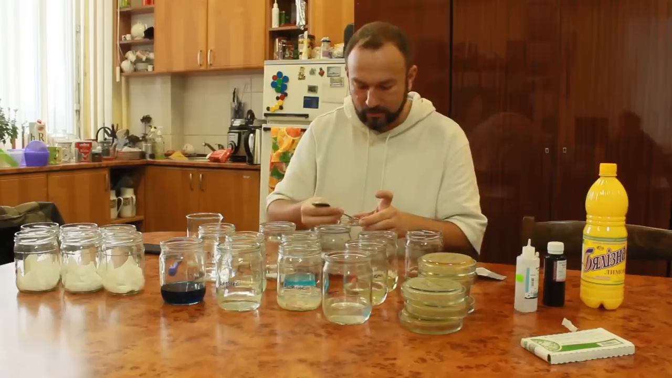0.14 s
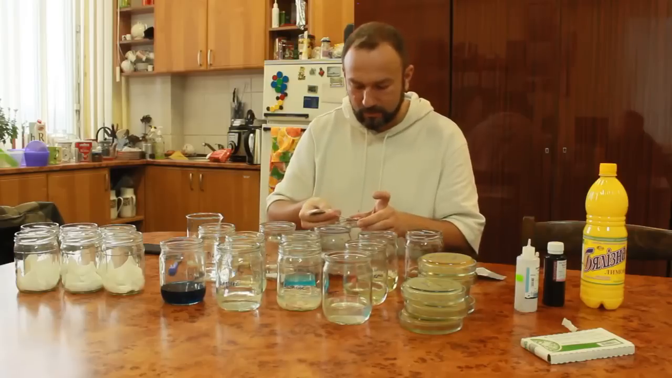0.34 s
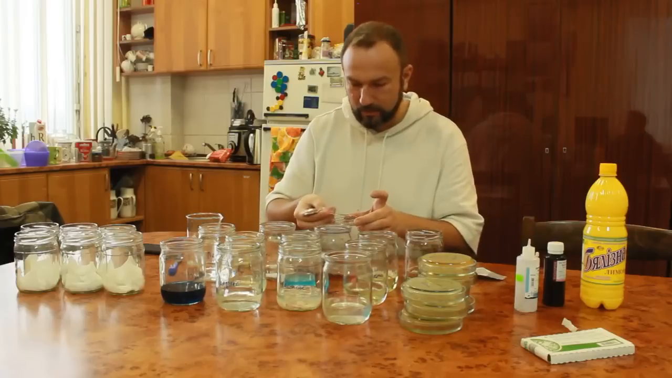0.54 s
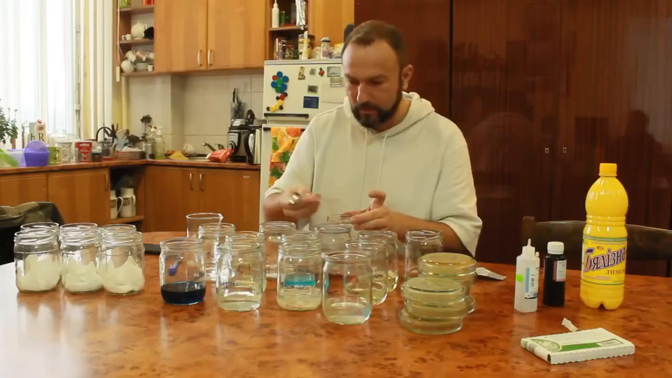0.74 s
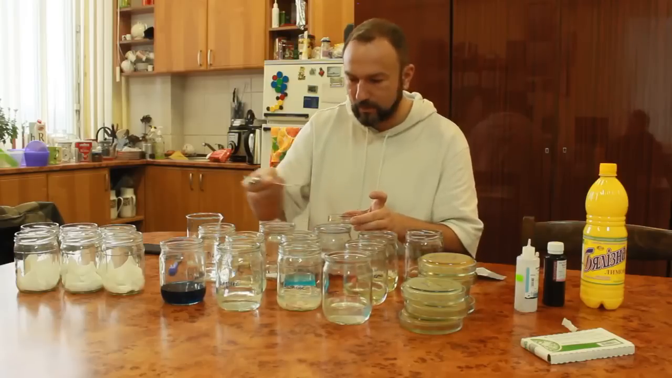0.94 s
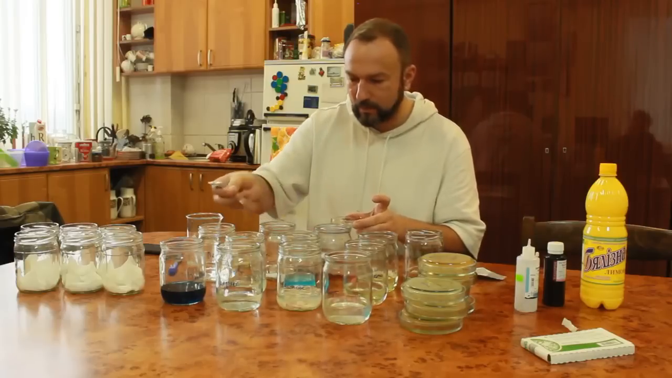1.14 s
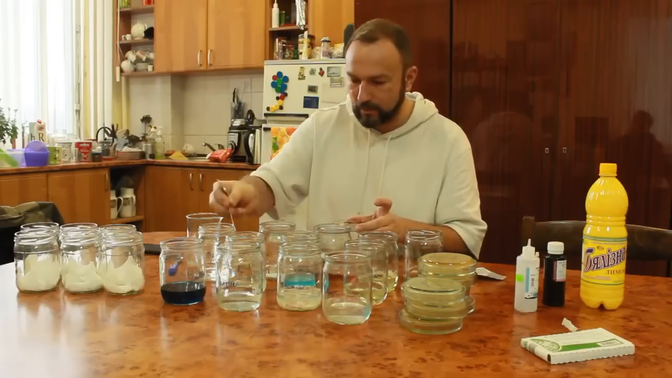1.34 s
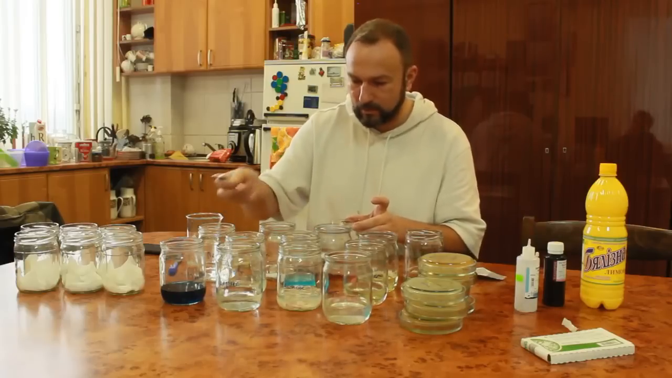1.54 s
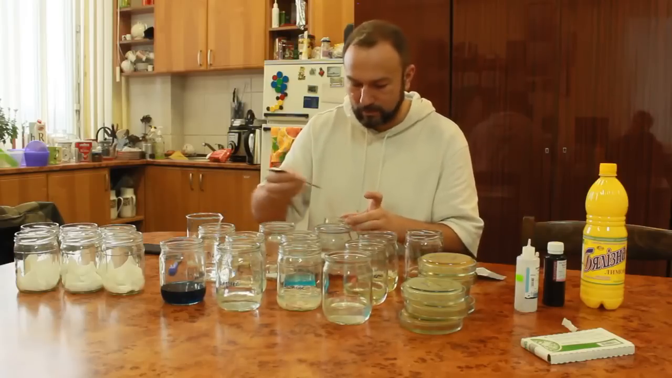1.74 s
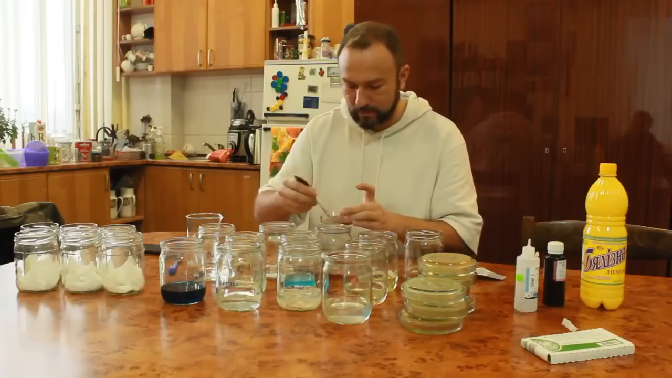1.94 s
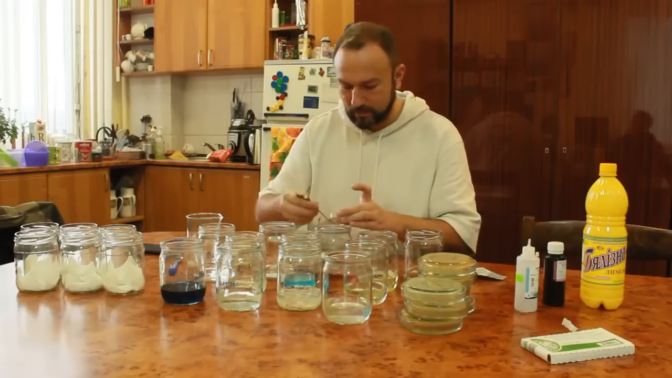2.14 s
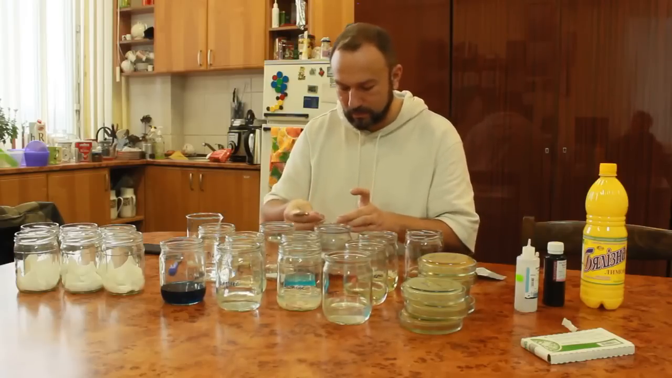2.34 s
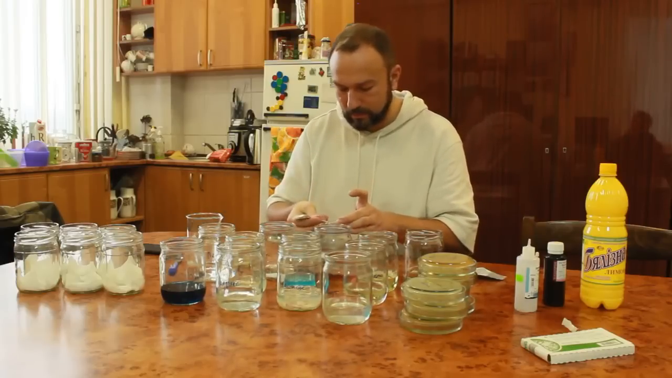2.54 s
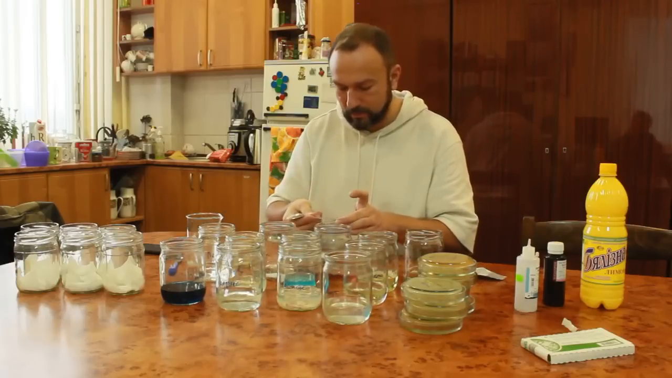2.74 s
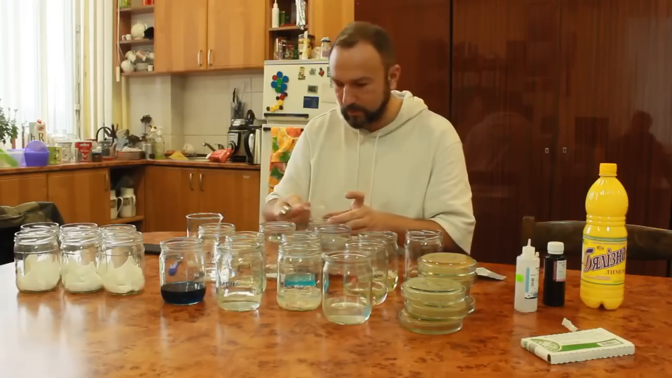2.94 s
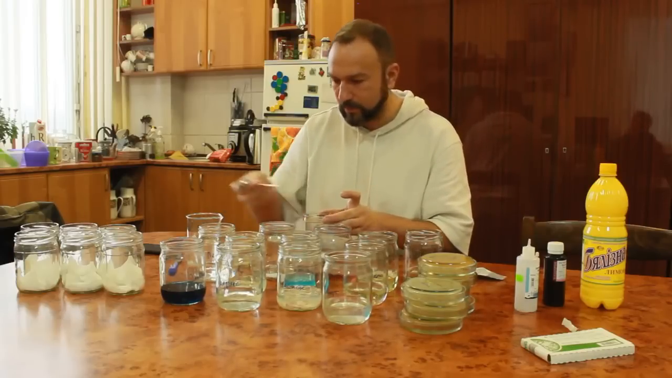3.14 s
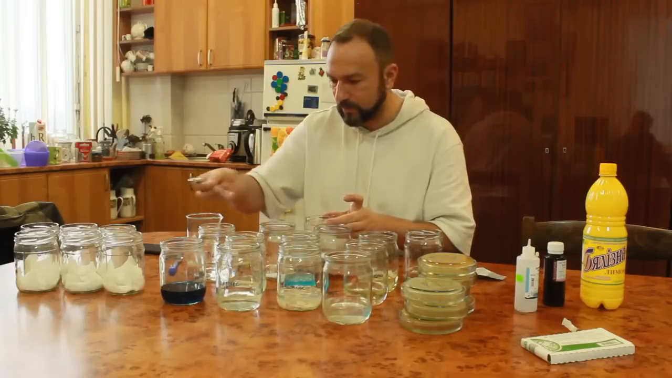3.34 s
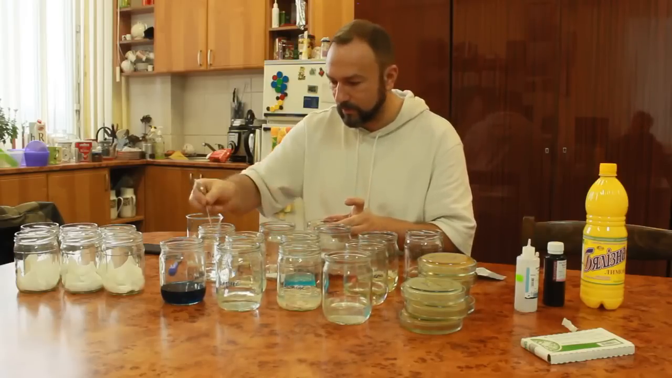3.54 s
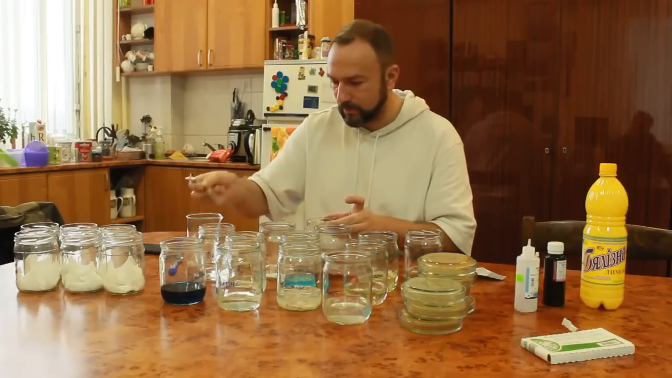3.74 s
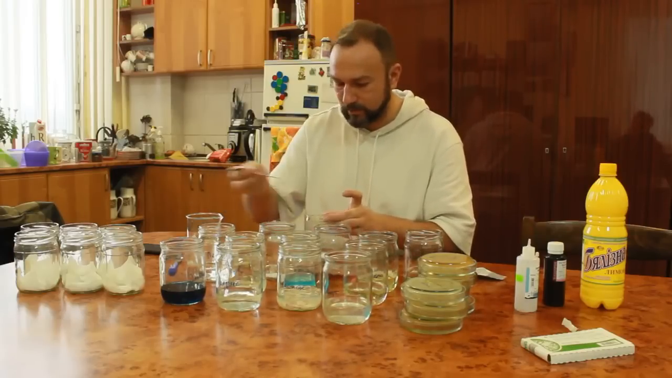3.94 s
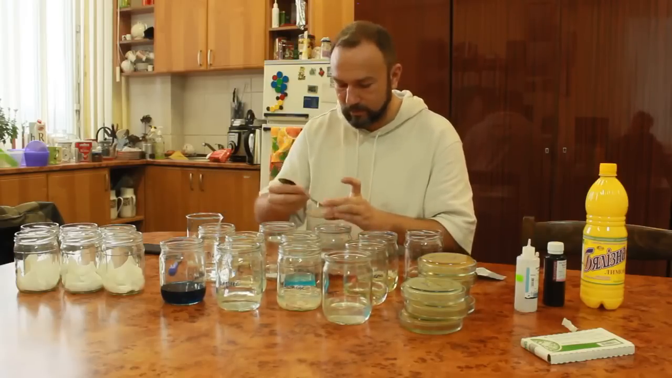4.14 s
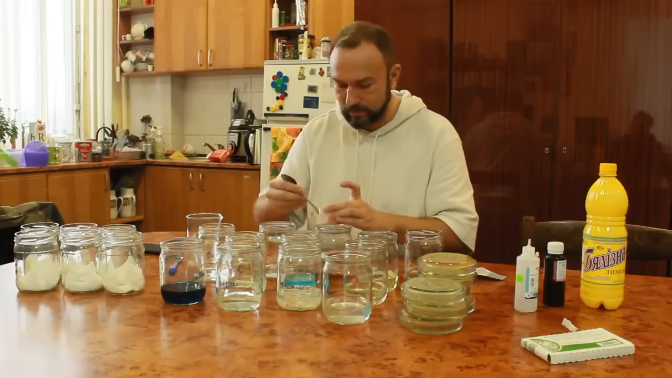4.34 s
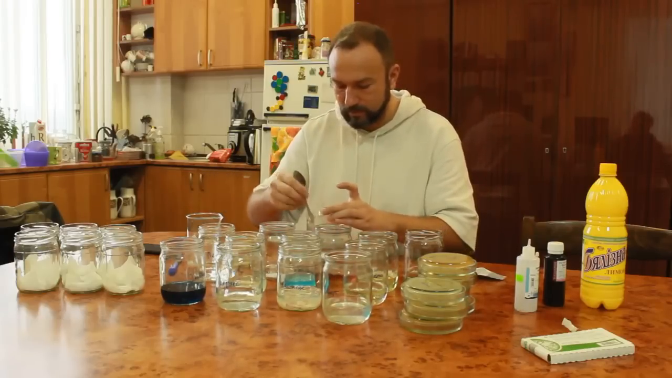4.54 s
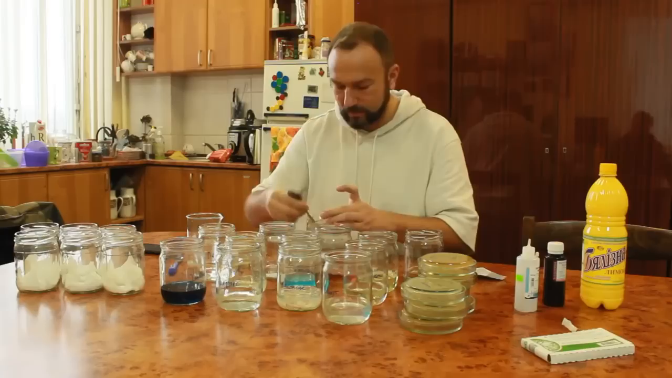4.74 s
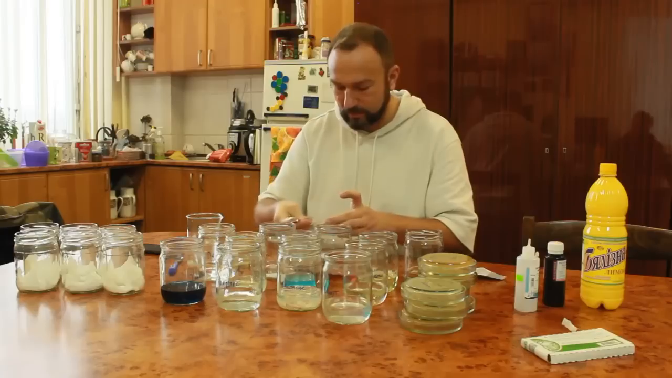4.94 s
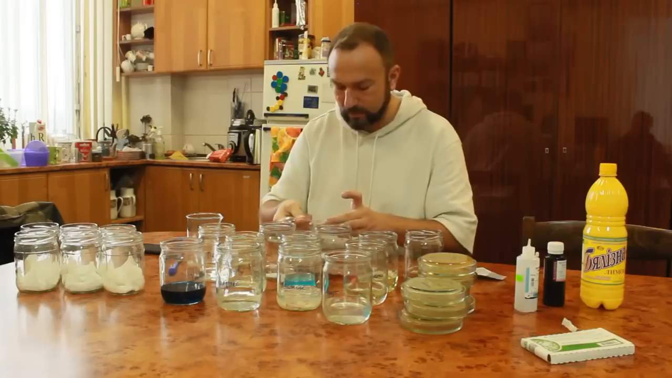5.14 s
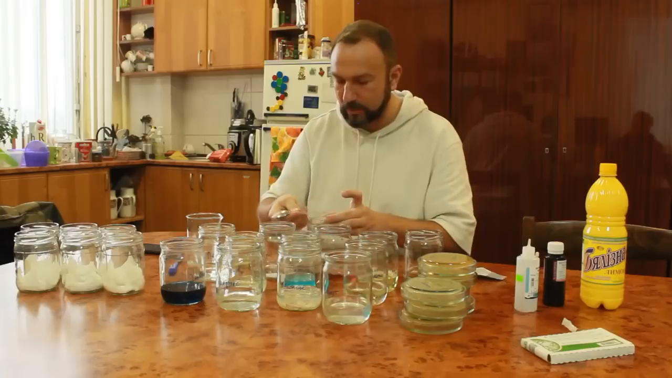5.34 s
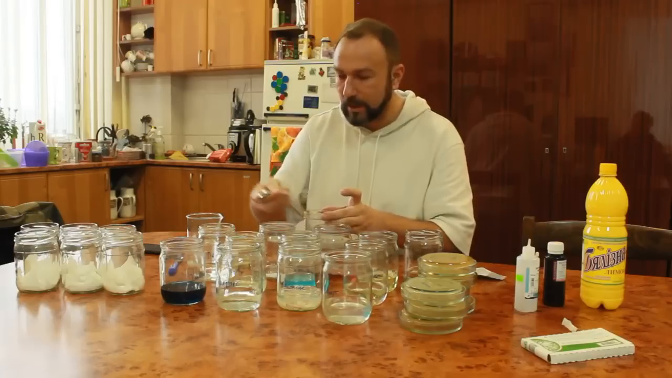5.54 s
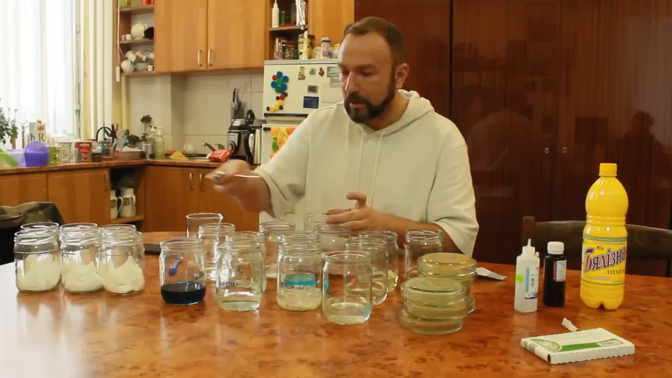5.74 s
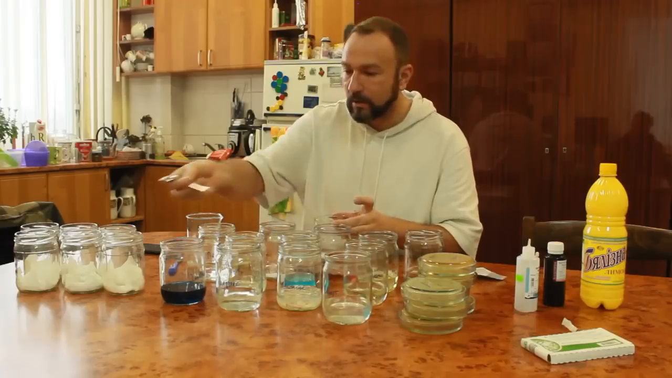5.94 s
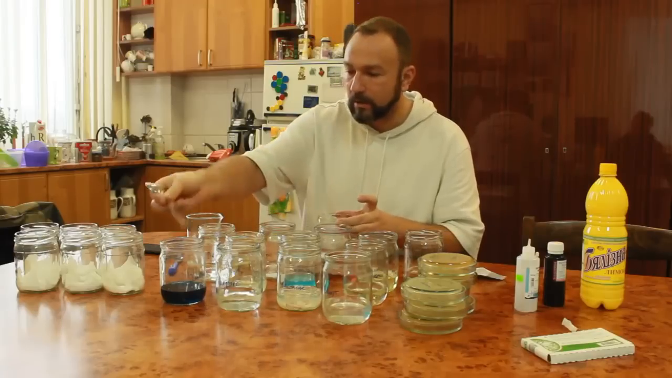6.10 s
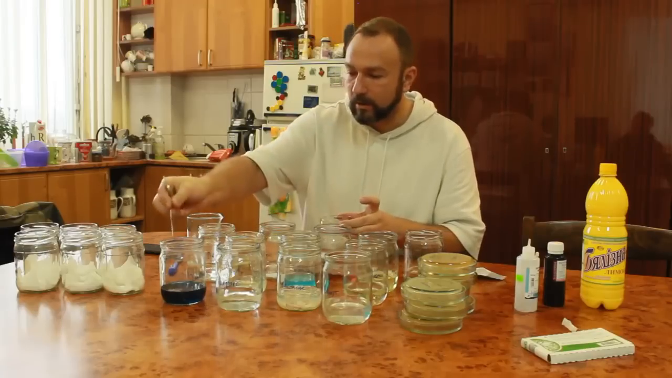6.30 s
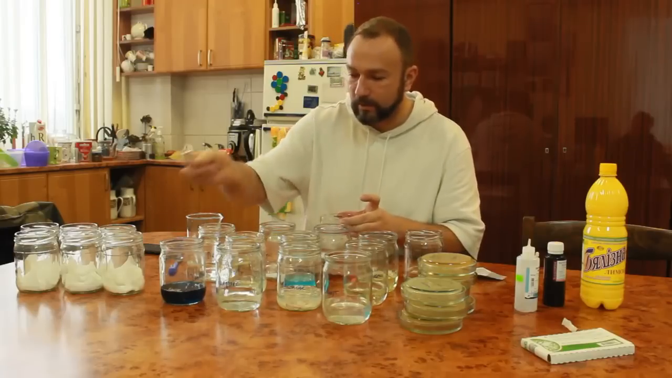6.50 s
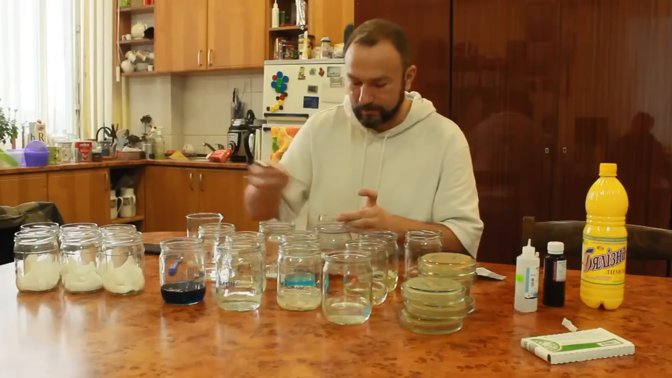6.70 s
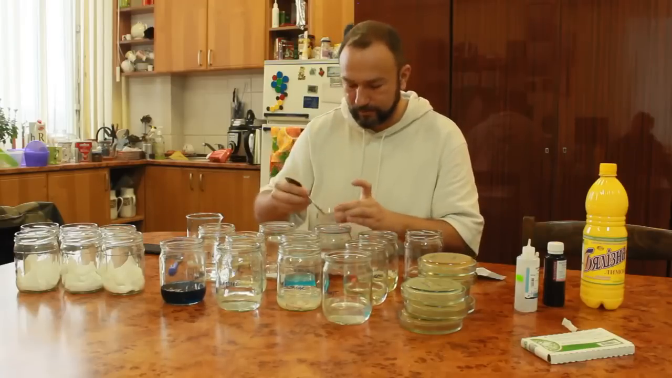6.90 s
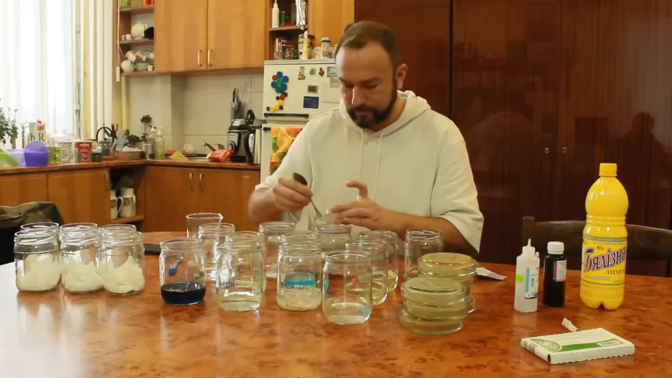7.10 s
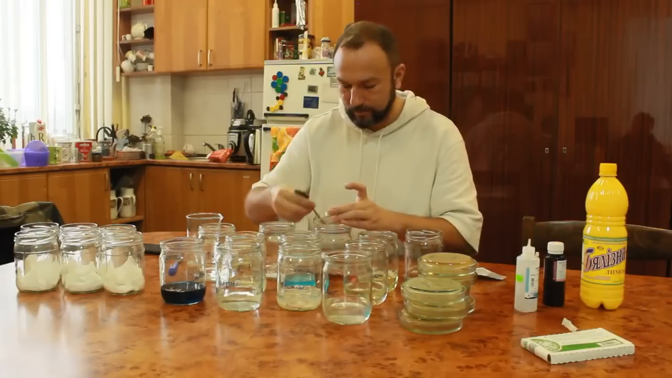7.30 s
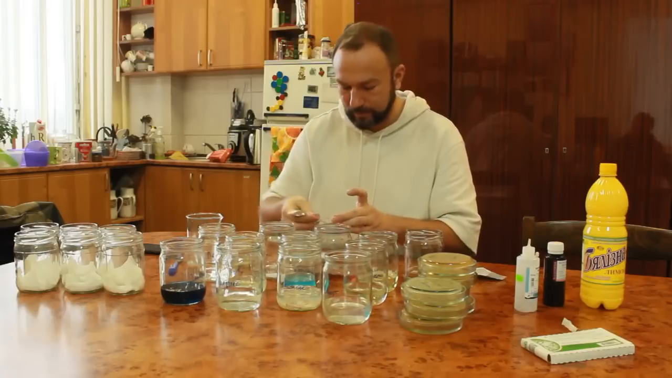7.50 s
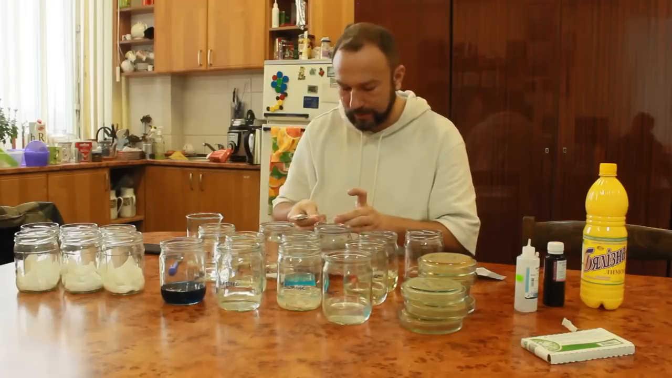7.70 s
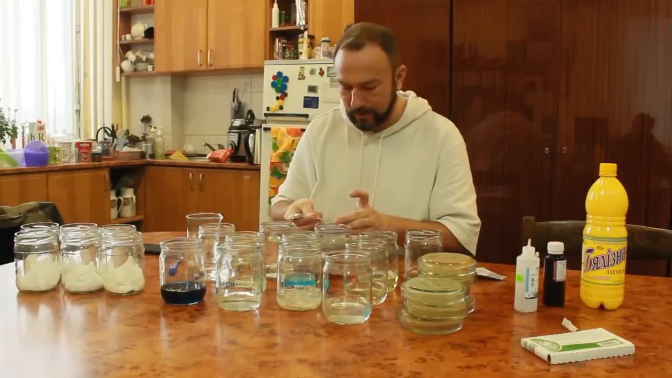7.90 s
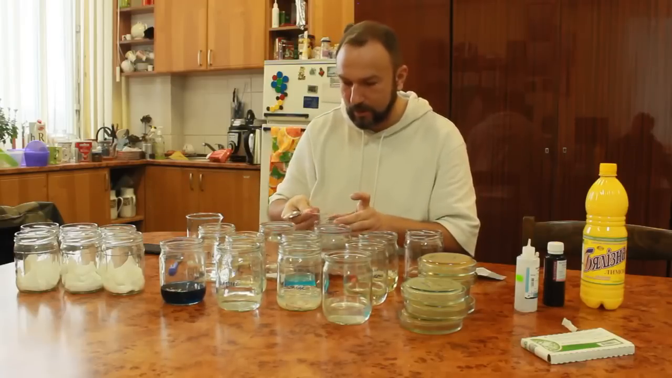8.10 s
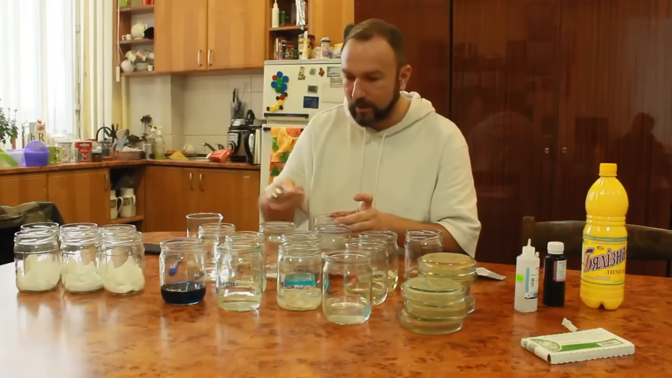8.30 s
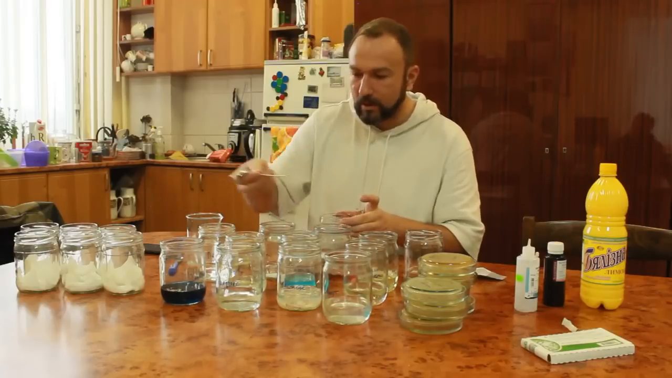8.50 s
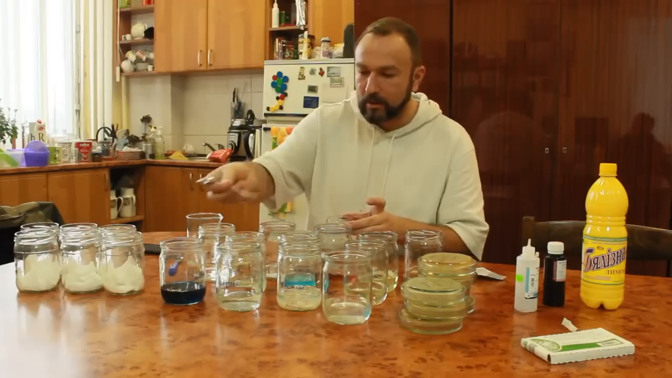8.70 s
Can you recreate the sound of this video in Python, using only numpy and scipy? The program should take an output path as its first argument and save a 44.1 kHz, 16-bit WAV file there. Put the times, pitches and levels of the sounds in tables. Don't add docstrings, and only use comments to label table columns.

```python
import sys
import numpy as np
from scipy import signal
from scipy.fft import rfft, irfft, next_fast_len
from scipy.io import wavfile
from scipy.ndimage import map_coordinates

SR = 44100
rng = np.random.default_rng(int(sys.argv[2]) if len(sys.argv) > 2 else 0)


def store_wav(level_fs):
    pcm = np.round(np.clip(np.atleast_2d(level_fs), -1, 1) * 32767)
    wavfile.write(sys.argv[1], SR, pcm.T.astype(np.int16))


def undo_db(level):
    steps = np.asarray(level, float) / 20
    return 10 ** steps


N = 390711


def unit(x):
    return x / np.sqrt(np.mean(x ** 2) + 1e-20)


def along(points, hz):
    point_hz, value = np.transpose(points)
    return np.interp(np.log(hz + 1), np.log(point_hz + 1), value)


def wobble(rate):
    s = np.arange(0, N / SR + 0.01, 0.01)
    knots = rng.standard_normal(int(N * rate / SR) + 4)
    curve = map_coordinates(knots, [s * rate])
    return np.interp(np.arange(N) / SR, s, curve)


def filtered(x, response):
    m = next_fast_len(len(x) + 8192)
    hz = np.fft.rfftfreq(m, 1 / SR)
    return irfft(rfft(x, m) * response(hz), m)[:len(x)]


def add(track, s, sound):
    part = track[round(s * SR):][:len(sound)]
    part += sound[:len(part)]


# (time [s], peak level [dB], thud level [dB], crack level [dB],
# lowest mode as the grip loads it [Hz])
BLOW_EVENTS = [
    (0.1272, -16, -32, -2.5, 2042),
    (2.157, -10.5, -32.5, -6.5, 2110),
    (4.7044, -7.5, -26.5, -5, 1968),
    (7.1183, -2, -43, -11, 2095),
    (7.2698, -4, -26, -11, 2117),
]
# (lowest level [dB], second level [dB], even family level [dB], odd family level [dB])
STRIKE_SPOTS = [(8.5, 8, -3.5, -2.5), (-1.5, 6, -6.5, -1), (-8, 9, 4, -10), (1.5, -6.5, -16, -5),
                (-10.5, 5, -6.5, -1)]
# (frequency [Hz], spectral peak level [dB], t60 [s])
GLASS_MODES = [(2800, -19, 0.014), (3849, -4, 0.034), (3961, -4.5, .022), (4790, -15, 0.012),
               (5815, 1, 0.014), (6660, -12.5, 0.012), (7400, -3, 0.021), (8335, -5.5, .017),
               (9170, -31.5, 0.0203), (10610, -6, .012), (11790, -2, .013), (12700, -15.5, 0.013),
               (13300, -22.5, .015), (15000, -22, .016)]
MODE_FAMILY = [0, 1, 1, 3, 2, 3, 3, 2, 3, 3, 2, 2, 3, 3]
# (frequency [Hz], level [dB], t60 [s])
GRAZED_MODES = [(1911, 6, .3), (3940, 0, 0.039), (2490, -3.5, 0.036), (1836, -13, 0.03),
                (1464, -13, 0.0068), (2480, -14.5, 0.012), (3260, 2, 0.0089)]
GRAZING_BLOW = [2, 0, 0, 4, 1, 4, 0]
# (frequency [Hz], width [Hz], depth [0-1])
HOLLOW_BANDS = [(3330, 230, 0.9), (1620, 280, 0.2)]


def blows():
    lowest_t60_s, scatter_db, scatter = 0.037, 1, 0.004

    def crack_colour(f):
        return f ** 6 / (f ** 6 + 1750.0 ** 6)

    def hollow_out(f):
        dips = [1 - depth / (1 + ((f - hz) / width) ** 2) for hz, width, depth in HOLLOW_BANDS]
        return np.prod(dips, axis=0)

    track = np.zeros(N)
    for k, (s, db, thud_db, crack_db, low_hz) in enumerate(BLOW_EVENTS):
        spot_db = np.array(STRIKE_SPOTS[k])
        modes = np.array(GLASS_MODES)
        modes[:, 0] *= 1 + scatter * rng.standard_normal(len(modes))
        modes[:, 1] += spot_db[MODE_FAMILY] + scatter_db * rng.standard_normal(len(modes))
        lowest = (low_hz, spot_db[0], lowest_t60_s)
        grazed = [mode for which, mode in zip(GRAZING_BLOW, GRAZED_MODES) if which == k]
        blow = ring(np.vstack([modes, lowest] + grazed))
        add(blow, 0, undo_db(thud_db + 2) * palm())
        add(blow, 0, undo_db(crack_db) * puff(crack_colour, t60=0.009))
        blow = filtered(blow, hollow_out)
        add(track, s, undo_db(db) * kitchen(blow))
    return track


# (time [s], peak level [dB], low rim mode level [dB], high rim mode level [dB],
# colour at 4.5 kHz [dB])
TAP_EVENTS = [(0.2244, -34, -7, -12, 0), (0.2354, -36.5, 4.5, -6, 4), (0.2843, -31.5, -14, -8, -12),
              (2.2483, -23, -19, -11, -2), (2.3211, -20.5, -6.5, -3.5, -5.5),
              (2.4334, -21.5, -7.5, -9, -12), (2.4833, -14, -7, -4, -10), (4.7571, -27, 7, 10, -8),
              (4.797, -16.5, 0, -2, -13), (4.9372, -24, -5.5, -2, -7), (5.0284, -31, 4.5, -10, -3),
              (7.428, -15, -9.5, -6, -9), (7.5448, -14, -3, -7, -3.5), (7.6051, -23, -7, -6, -23),
              (7.653, -16.5, -10, -6, -8.5), (7.7176, -27.5, 1, -2, 0), (7.7383, -22.5, -15, -4, -9),
              (8.0294, -57, -3, -17.5, 12)]
# (frequency [Hz], spectral peak level [dB], t60 [s])
DISH_MODES = [(2696, -6.5, 0.0055), (3825, -5.5, 0.024), (4570, -2.5, 0.0057), (5210, 5, 0.0044),
              (6200, 2, 0.0061), (7510, 5.5, 0.0053), (8450, 3.5, 0.01), (9350, -21, 0.013),
              (10440, -5.5, 0.0094), (11940, -0.5, 0.011), (12850, -5.5, 0.012), (14200, -18, 0.016),
              (15340, -13, 0.0092)]
# (frequency [Hz], t60 [s])
RIM_MODES = [(2075, .06), (5810, .025)]
COLOUR_HZ = [2600, 4500, 7900, 10500]


def taps():
    bright_db, thud_db = -5, -31
    track = np.zeros(N)
    for s, db, low_db, high_db, mid_db in TAP_EVENTS:
        levels = [mid_db + 6, mid_db, bright_db, 0]
        colour = [(1200, -36)] + list(zip(COLOUR_HZ, levels))
        modes = np.array(DISH_MODES)
        modes[:, 1] += along(colour, modes[:, 0]) + rng.normal(0, 1.33, len(modes))
        rim = [(hz, level_db + 9.5, t60) for (hz, t60), level_db in zip(RIM_MODES, (low_db, high_db))]
        tap = undo_db(-8.5) * ring(np.vstack([modes, rim]))
        add(tap, 0, undo_db(3.5) * puff(lambda f: undo_db(along(colour, f)), t60=0.0024))
        add(tap, 0, undo_db(thud_db) * palm())
        add(track, s, undo_db(db + 1.5) * kitchen(tap))
    return track


# (time [s], peak level [dB])
DROP_EVENTS = [
    (1.242, -26),
    (6.4325, -27.5),
]
# (frequency [Hz], spectral peak level [dB], t60 [s])
JAR_MODES = [(700, -5, .01), (1140, -2, .014), (1570, 1, .014), (2100, -4, .008), (2700, -2, .008),
             (3250, -5, .008), (3810, -7, .012), (4500, -12, .006), (5200, -15, .008), (7200, -17, .006)]


def drops():
    track = np.zeros(N)
    for s, db in DROP_EVENTS:
        add(track, s, undo_db(db - 8.5) * kitchen(ring(JAR_MODES)))
    return track


def ring(modes):
    t = np.arange(int(0.3 * SR)) / SR
    hz, db, t60 = np.transpose(modes)[:, :, None]
    t60 = np.clip(t60, 0.006, 0.3)
    press_s = 0.0014 + 1.42 / hz
    swell = np.sin(np.pi / 2 * np.clip(t / press_s, 0, 1)) ** 2
    fade = undo_db(db - 60 * t / t60) * 0.014 / t60
    tones = fade * np.sin(2 * np.pi * (hz * t + rng.random(hz.shape)))
    return (swell * tones).sum(0)


def palm():
    return puff(lambda f: (f / 950) ** 3 / (1 + (f / 950) ** 6), t60=0.018)


def puff(colour, t60):
    t = np.arange(SR // 20) / SR
    noise = unit(filtered(rng.standard_normal(len(t)), colour))
    return noise * undo_db(-60 * t / t60) * (1 - np.exp(-t / 0.00015))


# (frequency [Hz], t60 [s])
KITCHEN_T60 = [(500, 0.28), (2000, 0.54), (4000, 0.48), (8000, 0.31), (15000, 0.18)]
# (delay [s], level [dB])
EARLY_ECHOES = [(.0012, -8.5), (.009, -6), (.017, -14), (.03, -38)]
# (frequency [Hz], t60 [s], level [dB])
FREE_JARS = [(2071, 0.34, -12), (3890, 0.44, -16), (5805, 0.55, -20)]


def kitchen(x):
    hz, t, z = signal.stft(rng.standard_normal(int(0.65 * SR)), SR, nperseg=256)
    fade = undo_db(-60 * t / along(KITCHEN_T60, hz)[:, None])
    tail = signal.istft(z * fade, SR, nperseg=256)[1]
    t = np.arange(len(tail)) / SR
    tail *= 1 - np.exp(-t / 0.00085)
    answer = undo_db(3.5) * tail / np.linalg.norm(tail)
    for jar_hz, t60, db in FREE_JARS:
        answer += undo_db(db - 40.5 - 60 * t / t60) * np.sin(2 * np.pi * jar_hz * t)
    answer[0] = 1
    for delay, db in EARLY_ECHOES:
        answer[round(delay * SR)] += undo_db(db)
    return signal.fftconvolve(x, answer)


# (time [s], length [s], frequency [Hz], rms level [dB])
CREAK_EVENTS = [(5.969, 0.071, 2036, -56), (5.981, 0.015, 970, -51.5), (5.995, 0.084, 508, -58),
                (6.05, 0.021, 777, -53.5), (5.022, 0.041, 665, -55), (7.55, 0.035, 658, -53),
                (7.607, 0.044, 635, -53.5)]


def chair():
    track = np.zeros(N)
    for s, length, hz, db in CREAK_EVENTS:
        t = np.arange(round(length * SR)) / SR
        swell = np.sqrt(np.sin(np.pi * t / length))
        add(track, s, undo_db(db + 5) * swell * np.sin(2 * np.pi * hz * t))
    return track


# (time [s], length [s], frequency [Hz], rms level [dB])
RUSH_EVENTS = [
    (1.238, .12, 2808, -57),
    (6.42, .12, 2222, -55.5),
]


def spoonful_rush():
    track = np.zeros(N)
    for s, length, hz, db in RUSH_EVENTS:
        t = np.arange(round(length * SR)) / SR
        noise = rng.standard_normal(len(t))
        rush = unit(filtered(noise, lambda f: (f / hz) ** 2 / (1 + (f / hz) ** 4.9)))
        add(track, s, undo_db(db + 4.5) * np.sin(np.pi * np.sqrt(t / length)) * rush)
    return track


# (multiple, rms level [dB])
MAINS_LINES = [(4, -42.5), (5, -81), (6, -48.5), (8, -69.5), (10, -67.5), (13, -73.5), (14, -61), (16, -65),
               (18, -76), (20, -80)]
# (multiple, rms level [dB])
SHAFT_LINES = [(1, -70.5), (2, -70), (3, -76), (4, -54), (5, -69), (7, -60.5), (8, -63.5), (9, -63.5),
               (10, -61.5), (11, -82.5), (12, -69), (13, -73), (16, -81), (38, -67.5)]
# (frequency [Hz], width [Hz], rms level [dB])
CABINET = [(97.4, 36, -65.5), (1833, 140, -68.5), (2380, 100, -66.5), (782, 33, -66)]


def refrigerator():
    mains = (MAINS_LINES, 49.971, 0.78)  # overtones, rate [Hz], starting phase [rad]
    shaft = (SHAFT_LINES, 48.893, 4.42)
    t = np.arange(N) / SR
    hum = np.zeros(N)
    for lines, hz, start in (mains, shaft):
        turn = 2 * np.pi * hz * t + start
        for multiple, db in lines:
            multiple = round(multiple)
            unsteady_db = 0.11 * multiple ** 0.49 * wobble(2.41)
            hum += np.sqrt(2) * undo_db(db + unsteady_db) * np.cos(multiple * turn)
    for hz, width, db in CABINET:
        noise = rng.standard_normal(N)
        band = filtered(noise, lambda f: 1 / (1 + ((f - hz) / (width / 2)) ** 2))
        hum += undo_db(db + 0.74 * wobble(2.44)) * unit(band)
    return hum


# (frequency [Hz], level per Hz [dB])
AIR_COLOUR = [(25, -12.5), (100, -6), (300, -4), (800, -10.5), (2000, -15.5), (5000, -22.5), (10000, -26.5),
              (15000, -24.5)]


def air():
    noise = filtered(rng.standard_normal(N), lambda f: undo_db(along(AIR_COLOUR, f)))
    return undo_db(-51.5 + 1.06 * wobble(1.118)) * unit(noise)


def scene():
    spoon = blows() + taps() + drops()
    return (spoon + chair() + spoonful_rush() + refrigerator() + air())[None]


def band_limit(x):
    return signal.sosfilt(signal.butter(12, 16650, fs=SR, output="sos"), x)


def record(dry):
    top_hz = 15600
    edge_hz = [top_hz - 250, top_hz, 16500, 16600]
    edge_gain = [1, undo_db(-33), undo_db(-42), 0]
    band = filtered(dry[0], lambda f: np.interp(f, edge_hz, edge_gain))
    mix = band[None] + 0.001
    return band_limit(mix)


dry = scene()
out = record(dry)
store_wav(out)
```